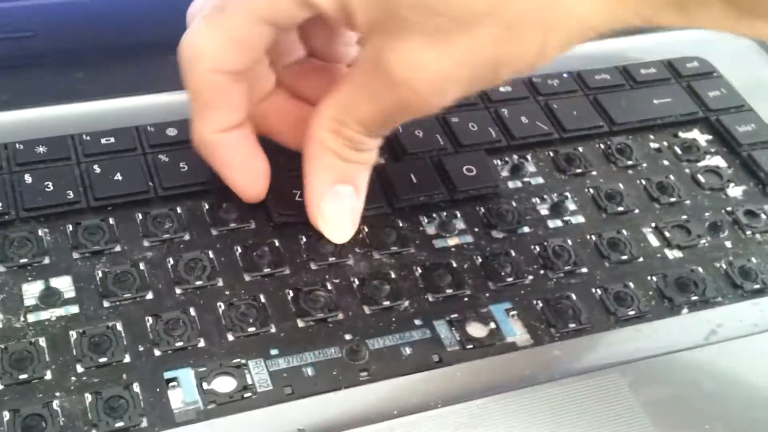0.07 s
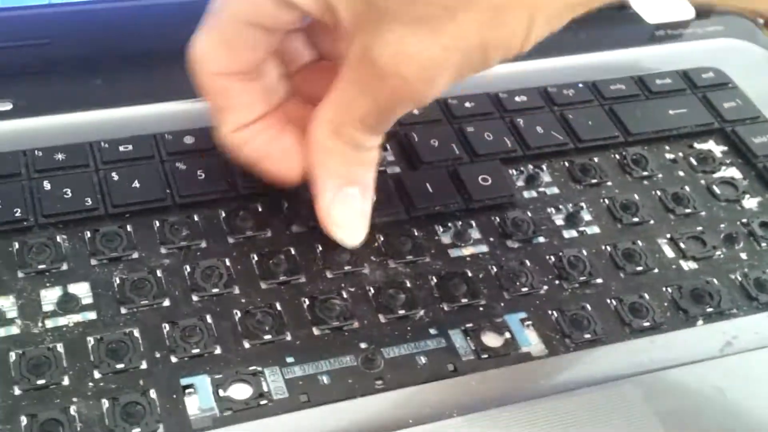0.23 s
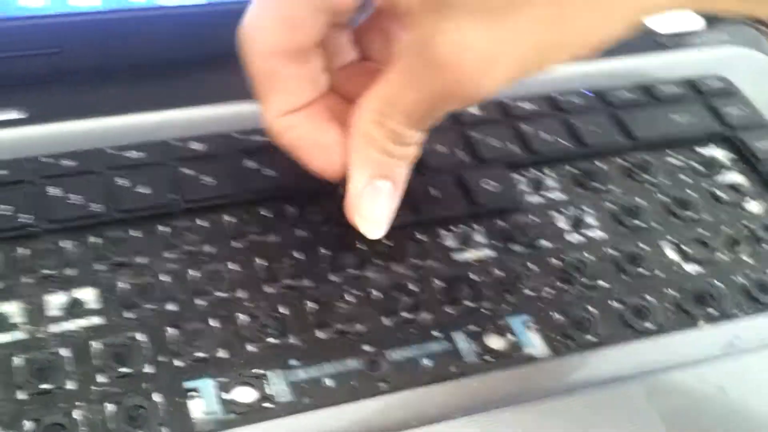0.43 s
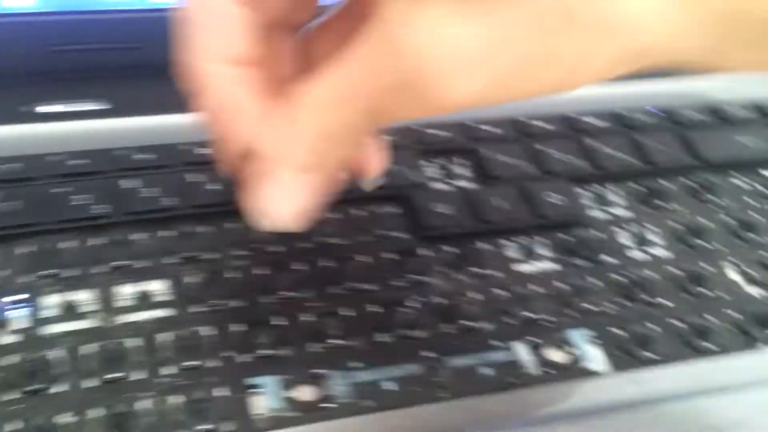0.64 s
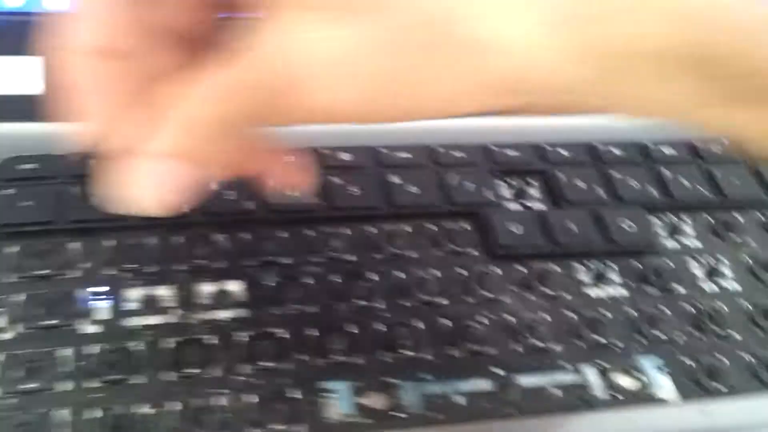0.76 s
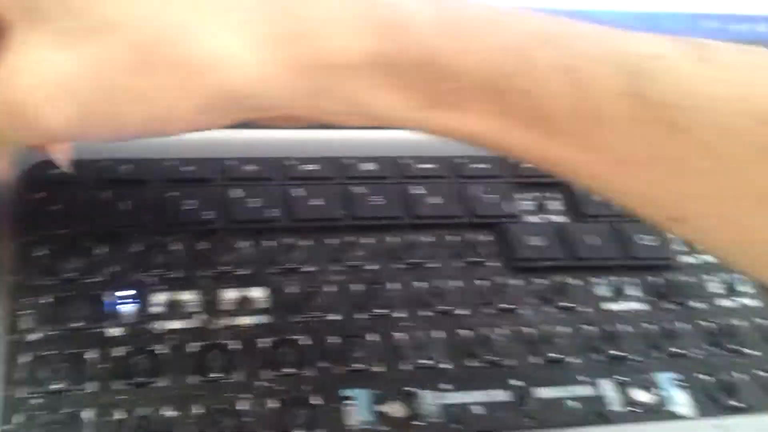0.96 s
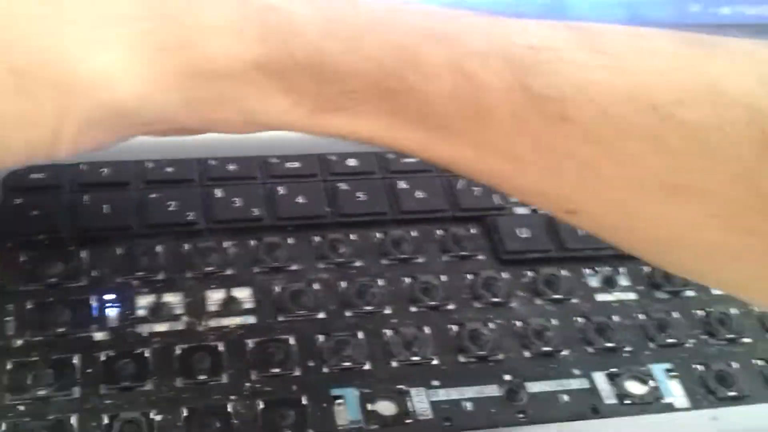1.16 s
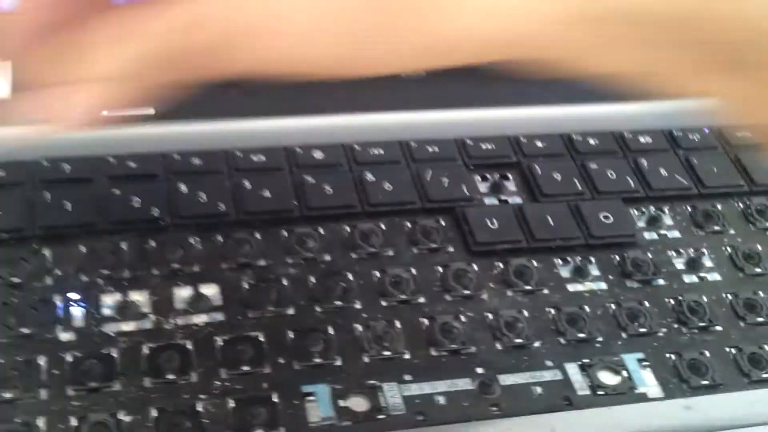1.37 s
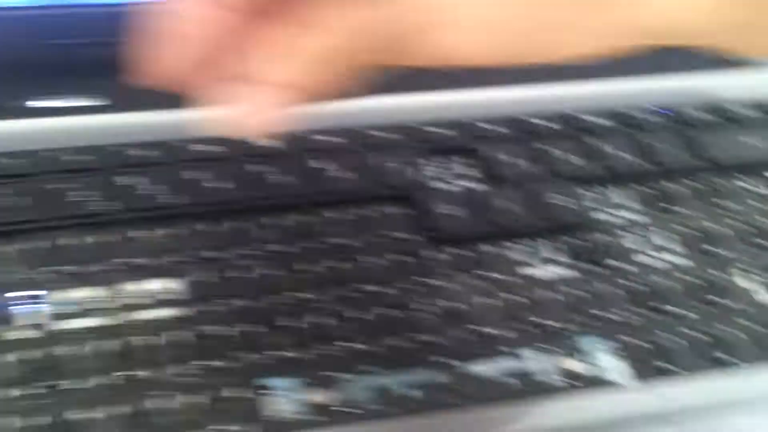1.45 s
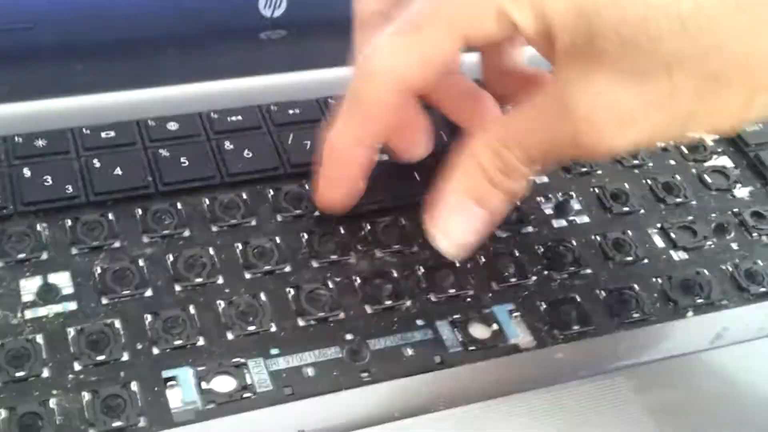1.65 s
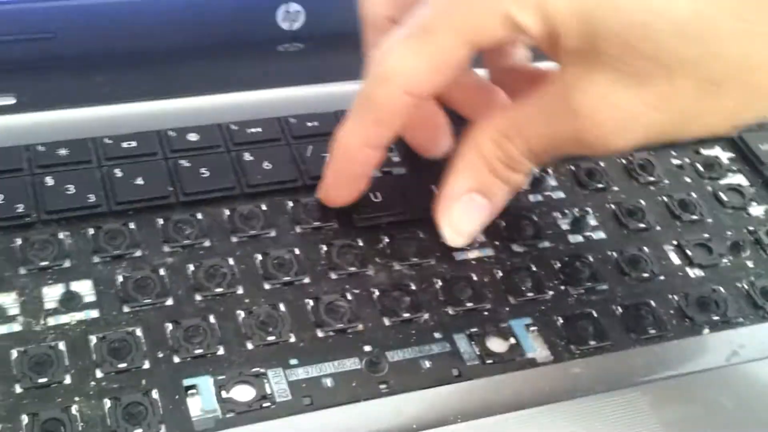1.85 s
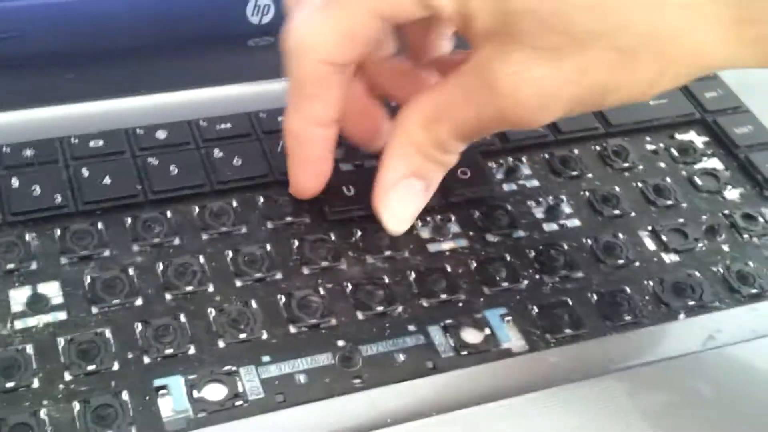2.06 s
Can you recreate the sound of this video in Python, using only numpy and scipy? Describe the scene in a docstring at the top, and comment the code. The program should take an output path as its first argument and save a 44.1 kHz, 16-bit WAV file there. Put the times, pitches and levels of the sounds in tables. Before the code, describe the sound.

A plastic laptop key is pried off close by, with a loud, sharp snap at 0.2 seconds and two weaker snaps at 0.3 and 0.4. After faint ticks near 0.95, the loose cap clatters briefly on a hard surface at about 1.2 seconds, slightly left. Fingertips tick softly on another key around 1.6. A small room rings briefly after each click, over quiet, steady hiss and hum.

```python
"""Prying off a laptop key

A keycap's clips let go in three sharp snaps, close to a handheld stereo recorder. The cap is dropped
to the left and clatters to rest on a hard surface, and fingertips tick on the next key. A small, hard
room rings after each click, over quiet hiss and hum. The loudest peaks overload the recorder."""
import sys
import numpy as np
from scipy import signal
from scipy.fft import rfft, irfft
from scipy.io import wavfile
from scipy.ndimage import uniform_filter1d

SR = 44100
rng = np.random.default_rng(int(sys.argv[2]) if len(sys.argv) > 2 else 0)


def materialize(psi):
    """Save the field psi as 16-bit PCM at rate SR to the path in sys.argv[1].

    A 1-D psi becomes a single channel; in a 2-D psi each row is a channel.
    """
    bounded = np.clip(np.atleast_2d(psi).T, -1, 1)
    quanta = np.round(bounded * 32767).astype(np.int16)
    wavfile.write(sys.argv[1], SR, quanta)


N = 92610
T = np.arange(N) / SR
FREQS = np.maximum(np.arange(N // 2 + 1) * SR / N, 1)
SIDES = np.array([[1], [-1]])  # left, right; a pan above 0 dB is louder on the left
SPREAD = np.minimum(FREQS / 2000, 1)  # the lower the pitch, the more alike the two microphones
CLICK_ATTACK_S = .00034


def amp(db):
    """Turn decibels into a number to multiply by."""
    return 10 ** (np.asarray(db) / 20)


def curve(points):
    """Join (frequency, value) points into a line across all pitches."""
    hz, values = np.array(points, float).T
    return np.interp(np.log(FREQS), np.log(hz), values)


def bell(hz, width, steepness=2):
    """A bump of height 1 around one pitch."""
    return 1 / (1 + (2 * (FREQS - hz) / width) ** steepness)


def fade(t60, start=0):
    """Die away from the start time on; t60 is the time it takes to drop 60 dB."""
    return (T >= start) * np.exp(-np.log(1000) * np.maximum(T - start, 0) / t60)


def delay(seconds):
    """Multiply a spectrum (a sound laid out by pitch) by this to make it come later."""
    return np.exp(-2j * np.pi * FREQS * seconds)


def unit(x):
    """Scale each channel to an energy of 1."""
    return x / np.sqrt(np.sum(x ** 2, axis=-1, keepdims=True))


def colour_filter(db):
    """A filter with these levels that rings only after a hit, never before."""
    forward_only = np.r_[1, np.full(N // 2 - 1, 2), np.zeros(N - N // 2)]
    return np.exp(rfft(irfft(np.log(amp(db)), N) * forward_only))


def tone(bass_db=0, middle_db=0, top_db=0):
    """Tone knobs that leave the 7 kHz heart of a click alone."""
    return curve([(500, bass_db), (2200, middle_db), (6500, 0), (8500, 0), (12000, top_db)])


def narrow_noise(hz, width):
    """Noise around one pitch, with an average power of 1."""
    spectrum = rfft(rng.standard_normal(N)) * bell(hz, width) ** 2
    return unit(irfft(spectrum, N)) * np.sqrt(N)


def crack(start, db, attack, t60, pan_db=0, left_lag_ms=0):
    """Spectrum of one contact: a split second of chatter, as both microphones hear it."""
    noise = rfft(rng.standard_normal((3, N)) * fade(t60) * (1 - np.exp(-T / attack)))
    burst = noise[0] + 1.2 * SPREAD * noise[1:]
    burst /= np.sqrt(uniform_filter1d(np.abs(burst) ** 2, size=1400, axis=-1))  # even out the pitches
    burst = rfft(irfft(burst, N) * (T < 2 * t60))  # keep it short
    return 10 * burst * amp(db + SIDES * pan_db / 2) * delay(start + SIDES * left_lag_ms / 2000)


# colour of the hiss: f/Hz, relative level/dB
HISS_COLOUR = [(15, -36.5), (25, -4.5), (54, -1.5), (81, -12), (130, -4.5), (240, -13), (358, -12.5),
               (388, -9.5), (563, -16.5), (755, -22), (985, -18.5), (1070, -19.5), (2020, -21.5),
               (2310, -27), (4150, -27.5), (6880, -28), (14500, -37)]
# how alike its left and right are: f/Hz, likeness/0-1
HISS_LIKENESS = [(100, 0.4), (400, 0.4), (1200, .55), (3000, .2), (10000, 0)]
def hiss(level_db=-50, left_lead_s=.000116):
    """Steady hiss, wide in the treble, that reaches the left side first."""
    middle, side = rfft(rng.standard_normal((2, N))) * amp(curve(HISS_COLOUR))
    alike = curve(HISS_LIKENESS)
    stereo = middle * np.sqrt(1 + alike) + SIDES * side * np.sqrt(1 - alike)
    noise = irfft(stereo * delay(-SIDES * left_lead_s / 2), N)
    return amp(level_db) * unit(noise) * np.sqrt(N)


# the room's hum: f/Hz, width/Hz, level/dB
HUM_BANDS = [(143, 30, -73), (347.3, 45, -62.5), (977, 35, -68.5)]
def hum():
    """A low, wavering hum made of narrow bands of noise."""
    return sum(amp(db) * narrow_noise(hz, width) for hz, width, db in HUM_BANDS)


# how the room rings on: f/Hz, t60/s, relative level/dB
ROOM_BANDS = [(125, .4, 12), (500, .33, 7.5), (1200, 0.24, 9.5), (2500, .42, 0), (4060, 0.34, 1.5),
              (5500, 0.62, -5.5), (7200, 0.36, 1), (9400, 0.42, -3.5), (11700, 0.444, 0.5), (15000, .38, 6)]
def room(gap_s=.0047, early_t60_s=.099, early_db=-5.5):
    """Spectrum of the room's echo: quick returns from nearby things, and a longer, blurred tail."""
    middle, side = rfft(rng.standard_normal((2, N)))
    noise = (middle + SIDES * SPREAD * side) / np.hypot(1, SPREAD)
    tail = 0
    for hz, t60, db in ROOM_BANDS:
        band = curve([(other_hz, other_hz == hz) for other_hz, *_ in ROOM_BANDS])
        tail += amp(db) * irfft(noise * band, N) * fade(t60, gap_s)
    early = irfft(noise, N)[:, ::-1] * fade(early_t60_s, gap_s)  # reversed noise, unlike the tail's
    return rfft(unit(tail) + amp(early_db) * unit(early))


# hand movements: t/s, length/s, f/Hz, width/Hz, level/dB
HAND_RUBS = [(.025, .04, 6800, 2500, -59), (.08, .18, 42, 25, -52), (.44, .05, 210, 120, -52),
             (1.86, .05, 300, 200, -53), (1.93, .08, 50, 20, -51)]
def rubs():
    """The moving hand rubs softly: each swish swells and fades."""
    return sum(amp(db) * narrow_noise(hz, width) * np.exp(-(2 * (T - peak) / length) ** 2)
               for peak, length, hz, width, db in HAND_RUBS)


# colour of a plastic click, for ticks and snaps alike: f/Hz, level/dB
CLICK_COLOUR = [(60, -19), (200, -21), (600, -15), (1200, -12), (2200, -11.5), (3500, -6), (4700, -1),
                (6000, -2.5), (7500, -3.5), (10000, -7), (12500, -20), (15000, -25.5)]
# light touches: t/s, level/dB, ring f/Hz, ring/dB, top/dB, t60/s, pan/dB
FINGER_TOUCHES = [(0.2211, -18.5, 4260, 12, -11, .01, -1), (0.4261, -34.5, 8600, 10, 2, 0.005, -1.5),
                  (0.9438, -35, 1600, 20, -17.5, .02, 5), (0.9631, -42, 1600, 27, -15, .025, -0.5),
                  (1.6173, -33.5, 8600, 14, 4.5, 0.013, -2.5), (1.630, -37.5, 4400, -23, -8, 0.01665, 1.5),
                  (1.6481, -37, 8030, 9, -3, 0.0084, 1.5)]
def ticks(echo, ring_width_hz=900, room_db=-3.5):
    """Fingertips touch the plastic, which ticks and creaks faintly."""
    out = 0
    for start, db, hz, ring_db, top_db, t60, pan_db in FINGER_TOUCHES:
        colour = curve(CLICK_COLOUR) + tone(top_db=top_db) + ring_db * bell(hz, ring_width_hz)
        out += crack(start, db, CLICK_ATTACK_S, t60, pan_db) * colour_filter(colour)
    return irfft(out * (1 + amp(room_db) * echo), N)


# colour of a bounce: f/Hz, level/dB
BOUNCE_COLOUR = [(80, -28.5), (220, -14.5), (380, 4.5), (580, 1.5), (800, -10.5), (1300, -8.5),
                 (2050, -5.5), (2500, -12.5), (2800, -27.5), (3250, -7.5), (4100, -13), (5300, -2),
                 (7000, -1.5), (8600, -1.5), (9800, -14), (15000, -30.5)]
# notes of the cap and the surface it hits: f/Hz, level/dB (for a 0 dB bounce), t60/s
LANDING_NOTES = [(366, -42, .25), (430, -39, .12), (493, -38, .13), (592, -38, .12), (1921, -40, .09),
                 (4754, -38, .09), (5323, -35, .12), (6741, -33, .11), (6935, -37, .1), (8475, -28, .06),
                 (8550, -24, .105)]
# the cap's landings: t/s, level/dB, knock/dB, t60/s, pan/dB
CAP_BOUNCES = [(1.1717, -4, 1, .012, 5.5), (1.1820, -8.5, -2.5, .016, 4.5), (1.1844, -15.5, -5.5, .01, 10),
               (1.1856, 4.5, -1, .016, 4), (1.1944, -8.5, -2, .02, 3), (1.2013, -9.5, -2, .016, 4.5),
               (1.202, -16, -4.5, .011, 5.5), (1.2059, -7, -3.5, .011, 7.5), (1.2204, -17, -3, .015, 4.5),
               (1.2244, -5.5, -4.5, .017, 6), (1.2795, -22.5, -5, .01, -1)]
def bounces(echo, attack_s=.0005, ring_left_lead_s=.000156, room_db=-9.5):
    """The loose cap clatters down; every bounce clicks and rings the same notes."""
    notes = np.array([amp(db) * rfft(fade(t60) * np.sin(2 * np.pi * hz * T))
                      for hz, db, t60 in LANDING_NOTES])
    pan_share = 1 - 1.2 * bell(450, 900)  # the low knock stays near the middle
    out = 0
    for start, db, knock_db, t60, pan_db in CAP_BOUNCES:
        flips = rng.choice([-1, 1], len(notes))  # each note starts upward or downward
        ring = flips @ notes * amp(db) * delay(start - SIDES * ring_left_lead_s / 2)
        click = crack(start, db, attack_s, t60, left_lag_ms=-.17)
        click *= colour_filter(curve(BOUNCE_COLOUR) + tone(bass_db=knock_db))
        out += (click + ring) * amp(SIDES * pan_db / 2 * pan_share)
    return irfft(out * (1 + amp(room_db) * echo), N)


# low notes of the laptop's body: f/Hz, level/dB, t60/s
BODY_NOTES = [(125, -27, .13), (215, -40.5, .12), (289, -42, .12), (385, -38.5, 0.16), (590, -39, .08)]
def thump(snap_time, snap_change_db, delay_s=.0024, follow=.84):
    """The laptop springs back after a snap; a weaker snap gives a softer thump."""
    start = snap_time + delay_s
    ring = sum(amp(db) * fade(t60, start) * np.sin(2 * np.pi * hz * (T - start))
               for hz, db, t60 in BODY_NOTES)
    return amp(follow * snap_change_db) * ring


# pitches the keyboard rings at: f/Hz, width/Hz, boost/dB
KEYBOARD_RINGS = [(809, 196, 0), (1112, 170, 6), (1620, 240, 5), (2140, 175, 2.5), (2570, 200, 2.5),
                  (3270, 600, 9), (5830, 414, 0.5), (6950, 610, -1)]
# echoes off the screen and desk: delay/s, level/dB
NEAR_ECHOES = [(.0027, -13), (.0092, -21.5)]
# clips letting go: t/s, level/dB, bass/dB, middle/dB, top/dB, t60/s,
# ring f/Hz, ring width/Hz, ring/dB, pan/dB, left lag/ms, room/dB
CLIP_SNAPS = [(.2230, 10, 1.5, -2, 2, .013, 6800, 2340, 3.5, 0.5, 0.14, -10),
              (.3287, -1, -4.5, -5.5, 6.5, 0.012, 7750, 2500, 4.5, 1.5, 0.13, -5.5),
              (0.4274, -6, -17, -9.5, -4, 0.0044, 8210, 2000, 12, 3, 0.1, -8)]
def snaps(echo):
    """Each clip cracks free, rings the keyboard and jolts the laptop; screen, desk and room echo it."""
    keyboard = curve(CLICK_COLOUR) + sum(db * bell(hz, width) for hz, width, db in KEYBOARD_RINGS)
    near = sum(amp(db) * delay(seconds) for seconds, db in NEAR_ECHOES)
    first_db = CLIP_SNAPS[0][1]
    out = 0
    for start, db, bass, middle, top, t60, hz, width, ring_db, pan_db, lag_ms, room_db in CLIP_SNAPS:
        colour = keyboard + tone(bass, middle, top) + ring_db * bell(hz, width, steepness=8)
        direct = crack(start, db, CLICK_ATTACK_S, t60, pan_db, lag_ms) * colour_filter(colour)
        out += irfft(direct * (1 + near + amp(room_db) * echo), N)
        out += thump(start, db - first_db)
    return out


def scene():
    """All the sounds together in one room."""
    echo = room()
    return snaps(echo) + bounces(echo) + ticks(echo) + rubs() + hiss() + hum()


def record(dry, clip_db=-2.5, top_hz=14500):
    """The recorder flattens the loudest peaks and cuts the highest treble."""
    clipped = np.clip(dry, -amp(clip_db), amp(clip_db))
    treble_cut = signal.ellip(8, .2, 70, top_hz, fs=SR, output="sos")
    return np.clip(signal.sosfilt(treble_cut, clipped), -1, 1)


dry = scene()
out = record(dry)
materialize(out)
```